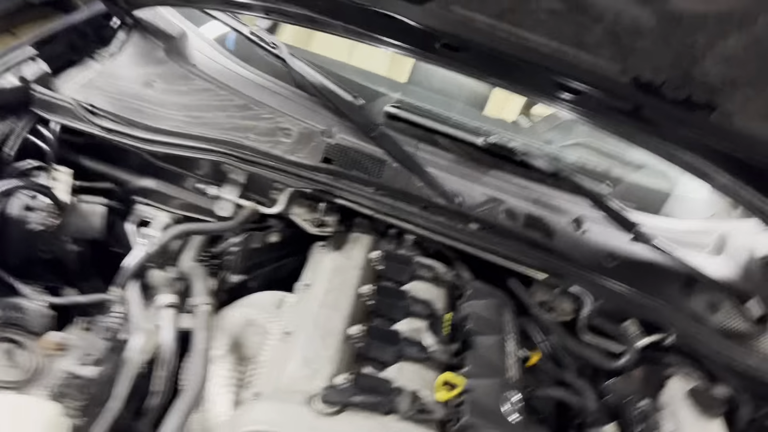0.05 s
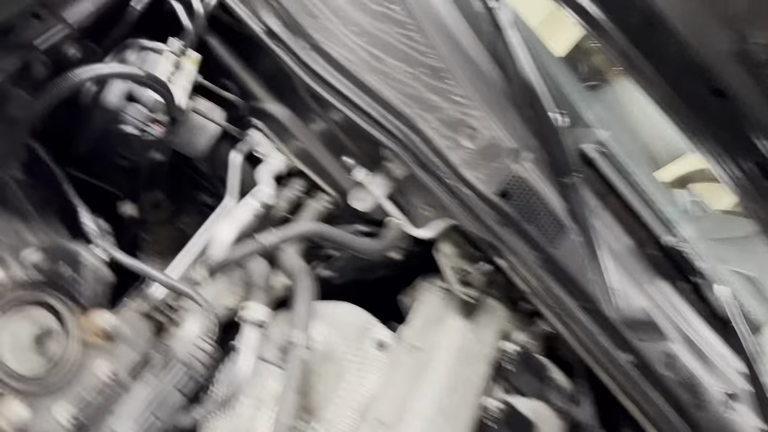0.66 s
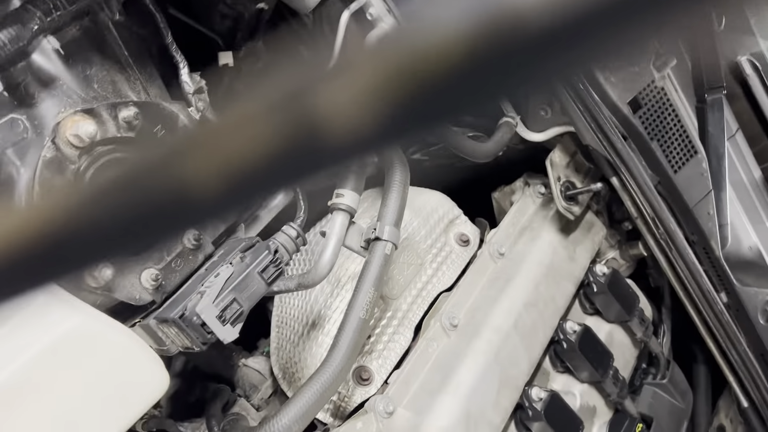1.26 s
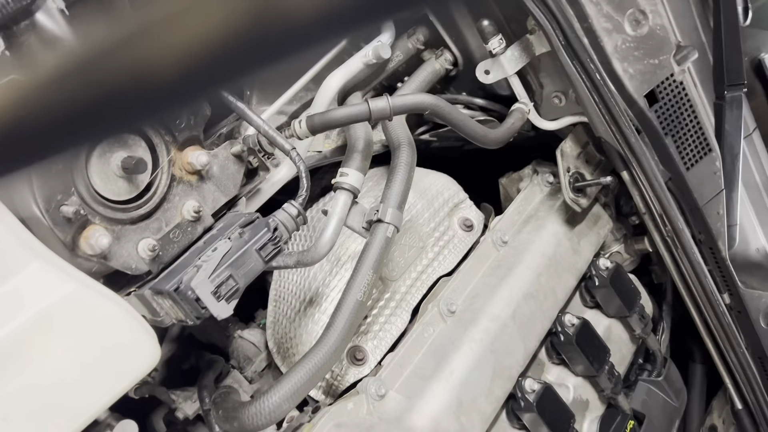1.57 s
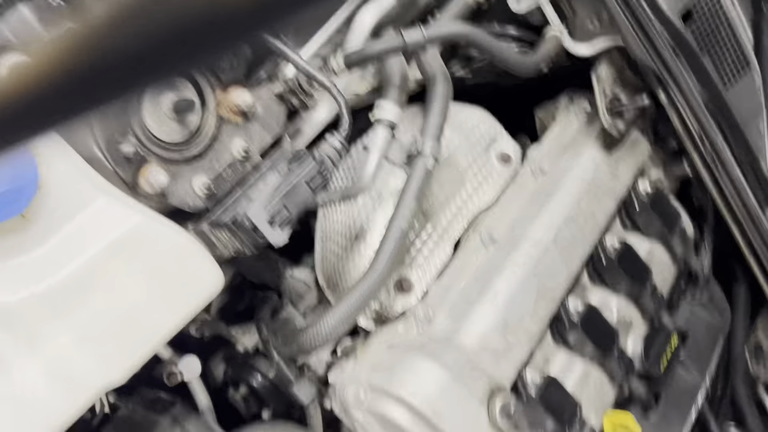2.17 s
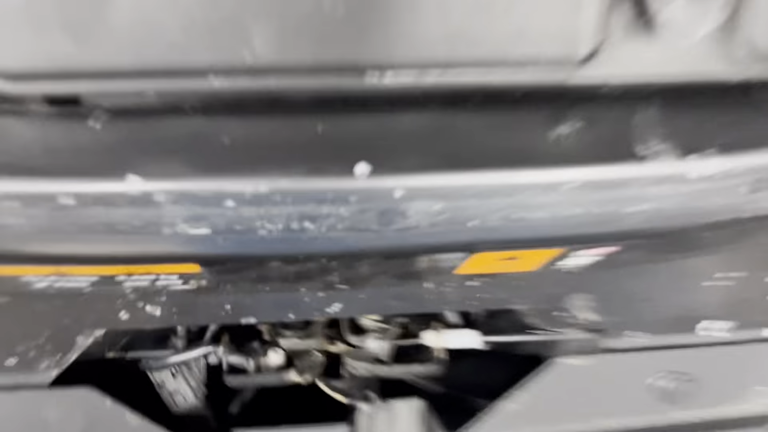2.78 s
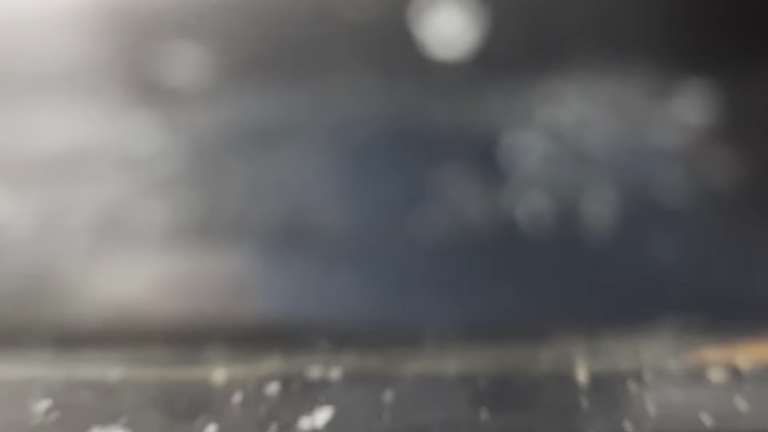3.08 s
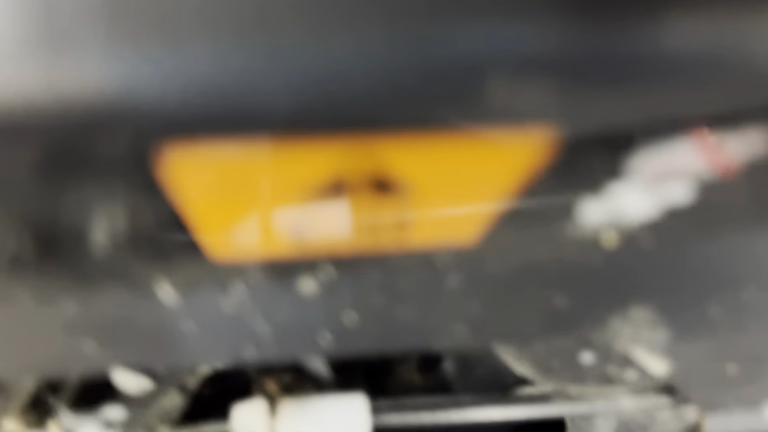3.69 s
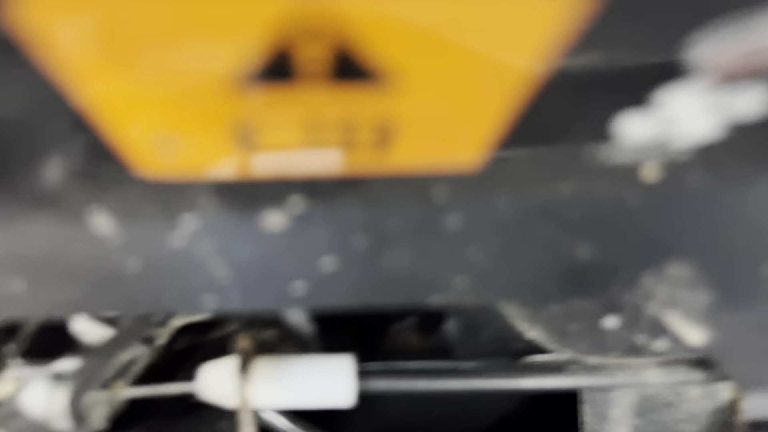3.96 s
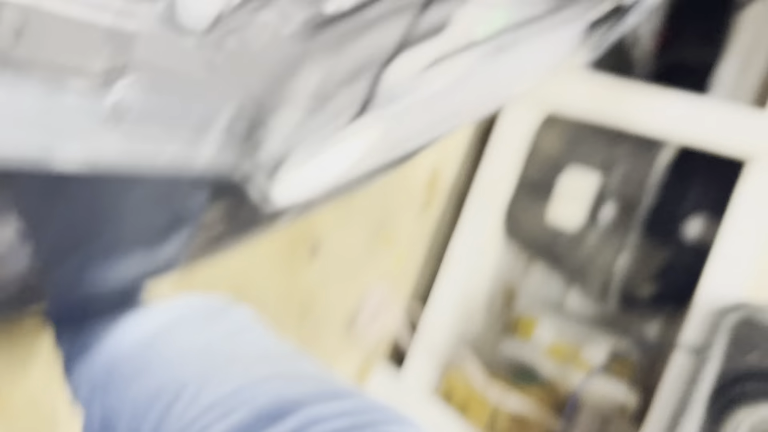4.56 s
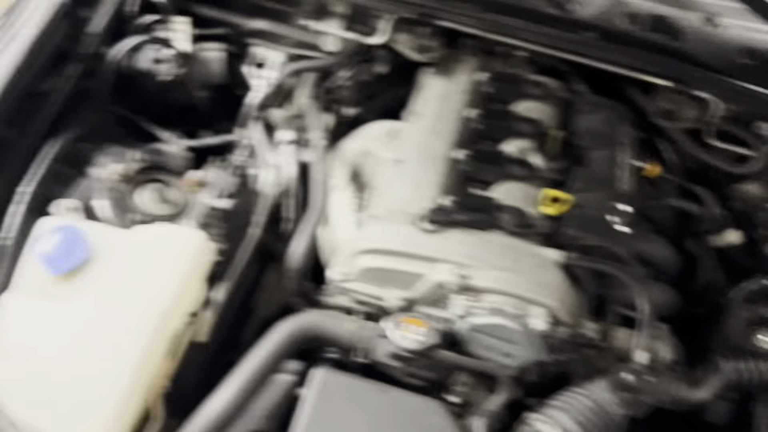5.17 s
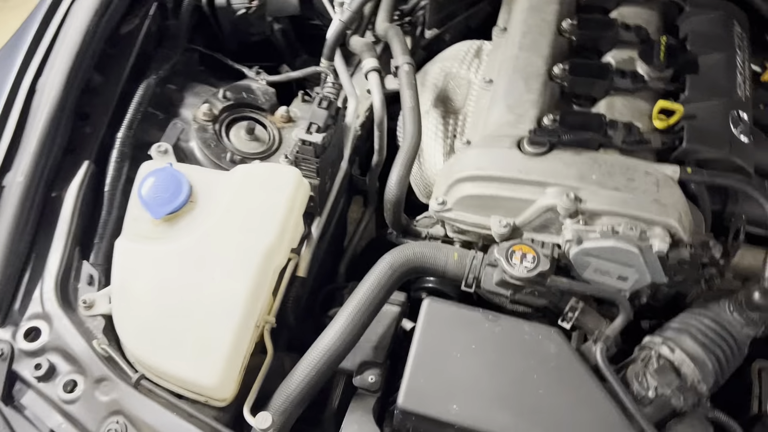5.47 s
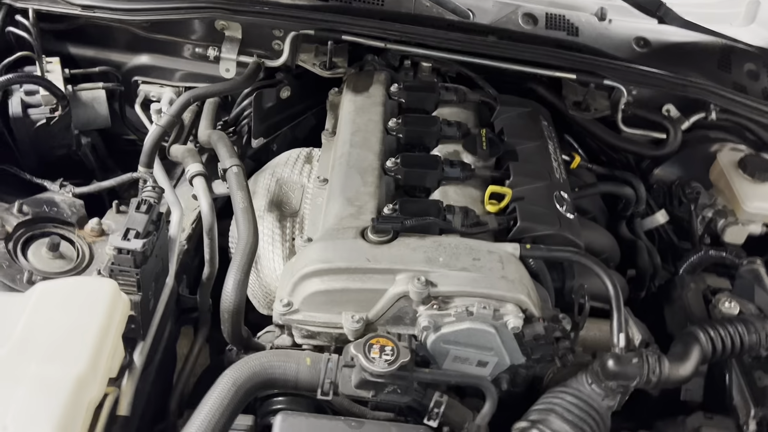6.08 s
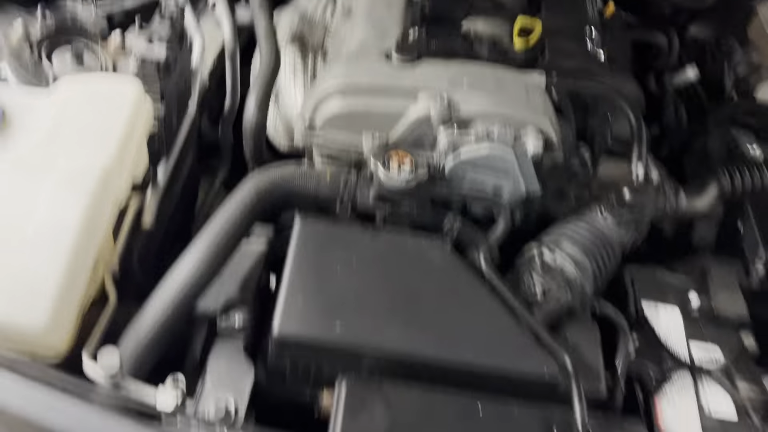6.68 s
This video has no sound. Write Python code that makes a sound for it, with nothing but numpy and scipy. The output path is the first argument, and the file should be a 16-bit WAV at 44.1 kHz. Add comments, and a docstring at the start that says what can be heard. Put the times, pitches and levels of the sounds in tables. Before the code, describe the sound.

Loose metal clunks, a clacking catch, then a car hood banging shut, followed by soft bumps and scuffs in a garage.

```python
"""Someone works at a car's steel hood in a garage, a camera in one hand. Over a low rumble, clothes rustle,
light knocks land on the bodywork and a small part ticks. From 1.2 s the loose hood clunks on its supports;
then steel parts jingle faintly and the hand bumps the camera. At 3 s the hood shudders and its safety
catch clacks twice. Near 4 s one loud bang of steel on the latch leaves the hood ringing. More bumps,
scuffing and clicking soles and a few last knocks follow. The garage adds a short echo."""
import sys
import numpy as np
from scipy import signal
from scipy.fft import rfft, irfft, next_fast_len
from scipy.io import wavfile
from scipy.ndimage import uniform_filter1d, map_coordinates

SR = 44100
rng = np.random.default_rng(int(sys.argv[2]) if len(sys.argv) > 2 else 0)


def to_wav(s):
    """Save 16-bit WAV."""
    ch = np.atleast_2d(s).T  # columns
    pcm = np.round(np.clip(ch, -1, 1) * 32767)  # PCM
    wavfile.write(sys.argv[1], SR, pcm.astype(np.int16))


N = 301644

# the hood's lasting tones, and the boom of the car's front end: pitch_hz, level_db, fade_s
# (fade_s is always the time to fall by 60 dB)
HOOD_TONES = [(224, -6.5, 0.87), (369, -12, .9), (409, -5, 0.55), (450, -17, 0.87), (549, -14.5, 0.65),
              (680, -16, 0.3), (980, -24, 0.4), (1120, -16, 0.37), (1166, -13.5, 0.7), (1310, -19, 0.7),
              (1530, -24.5, .45), (1560, -23, 0.35), (1700, -24, 0.81), (1744, -22, 0.35),
              (2100, -23.5, 0.7), (2200, -27.5, 0.52), (2552, -32, .45)]
BOOM_TONES = [(63, -8, 0.44), (75.7, -4.5, 0.4), (85, 0.5, 0.21), (111.4, 5, 0.098), (146.6, -3, 0.34),
              (177.4, -3.5, 0.23), (221.9, -1.5, 0.14), (264, -5, 0.062)]
# resonances, the pitches that the steel panel favours: pitch_hz, width_hz, boost_db
PANEL_PEAKS = [(404, 21, 6), (514, 73, 5.5), (651, 27, 4.5), (756, 14, 1.5), (1016, 24, 2.5), (1066, 58, 6),
               (1152, 32, 7), (1234, 54, 9), (1356, 21, 5), (1450, 91, 6.5), (1684, 140, 6.5),
               (2006, 100, 5), (2420, 60, 3), (5040, 750, 6.5)]
# the colour (balance of bass and treble) of each kind of hit: pitch_hz, level_db
KNOCK_COLOUR = [(100, -14.5), (220, 1.5), (450, -2), (780, -11.5), (1200, -13.5), (2400, -19), (6000, -26),
                (9000, -35), (16000, -48)]
TICK_COLOUR = [(350, -19.5), (600, -1), (1550, -11), (2610, -12), (3680, -17.5), (9110, -22), (10500, -32),
               (11700, -23.5), (16000, -36)]
CLUNK_COLOUR = [(120, -26), (280, -4.5), (480, -9), (800, -12), (1300, -13), (1900, -19), (2700, -13.5),
                (5000, -29), (9000, -35), (11000, -47), (16000, -58)]
CATCH_COLOUR = [(120, -12), (240, -3), (600, -2.5), (1100, -12), (2000, -19.5), (3200, -21.5), (6500, -24),
                (9500, -22), (12500, -22.5), (16000, -30.5)]
# how fast struck sheet steel and longer-shivering steel fall silent: pitch_hz, fade_s
SHEET_FADE = [(200, 0.44), (600, 0.26), (1500, 0.2), (4000, 0.087), (12000, 0.19)]
SHIVER_FADE = [(300, 1), (1200, 0.62), (2400, 0.47), (4000, 0.58), (9000, 0.89), (14000, 0.13)]
# how alike the two ears hear a sound from ahead: pitch_hz, likeness (1 same, -1 opposite)
AHEAD = [(120, 0.96), (280, 0.27), (600, 0.08), (1500, 0.27), (8000, 0.14)]
# the safety catch clacking over the striker, the bar it grips: start_s, body_db, boom_db, snap_db, snap_hz
CATCH_CLACKS = [(3.178, -20.5, -26.5, -35.5, 8700), (3.2044, -37.5, -33, -38.5, 4338)]


def amp(db):
    """Turn decibels into a gain."""
    return 10 ** (np.asarray(db) / 20)


def unit(x):
    """Scale to an average (rms) level of 1."""
    return x / np.sqrt(np.mean(x ** 2) + 1e-20)


def unit_hit(x):
    """Scale a hit to an average (rms) level of 1 over its first 30 ms."""
    return x / np.sqrt(np.mean(x[..., :SR // 33] ** 2) + 1e-20)


def along(points, hz):
    """Read between the (pitch_hz, value) points of a curve, on a log pitch axis."""
    pitches, values = np.transpose(points)
    return np.interp(np.log(hz + 1), np.log(pitches + 1), values)


def wobble(per_s):
    """A smooth curve through per_s random values a second."""
    return map_coordinates(rng.standard_normal(int(N * per_s / SR) + 4), [np.arange(N) * per_s / SR])


def add(track, start_s, sound):
    """Mix a sound into the track."""
    start = round(start_s * SR)
    track[:, start:start + sound.shape[-1]] += sound[..., :N - start]


def shape(colour, peaks, hz):
    """The level in dB of a colour with resonances on top."""
    return along(colour, hz) + sum(db / (1 + (2 * (hz - f) / width) ** 2) for f, width, db in peaks)


def stereo(mid, side, likeness, hz):
    """Blend two unrelated spectra into left and right ones with the given likeness."""
    turn = np.arccos(np.clip(along(likeness, hz), -1, 1)) / 2
    return mid * np.cos(turn) + np.array([side, -side]) * np.sin(turn)


def noise(colour, size, peaks=()):
    """Coloured stereo noise from ahead."""
    hz = np.fft.rfftfreq(size, 1 / SR)
    phases = np.exp(2j * np.pi * rng.random((2, len(hz))))
    return unit(irfft(stereo(*phases, AHEAD, hz) * amp(shape(colour, peaks, hz)), size))


def split(x, edge_hz):
    """The parts of a sound below and above a pitch."""
    size = x.shape[-1]
    low = irfft(rfft(x) / (1 + (np.fft.rfftfreq(size, 1 / SR) / edge_hz) ** 8), size)
    return low, x - low


def fade(x, fades):
    """Let each pitch die away at its own speed."""
    hz, t, spectra = signal.stft(x, SR, nperseg=256)
    dying = spectra * amp(-60 * t / along(fades, hz)[:, None])
    return signal.istft(dying, SR, nperseg=256)[1][:, :x.shape[-1]]


def patchy(x):
    """Let a sound's colour shift from moment to moment."""
    spectra = signal.stft(x, nperseg=512)[2]
    patches = uniform_filter1d(rng.standard_normal(spectra.shape[1:]), size=7, axis=0)
    shift_db = 3 * unit(uniform_filter1d(patches, size=5, axis=1))
    return signal.istft(spectra * unit(amp(shift_db)), nperseg=512)[1][:, :N]


def causal(gain):
    """A filter with this gain that rings only after it is hit, never before."""
    cepstrum = irfft(np.log(gain + 1e-9))
    half = cepstrum.shape[-1] // 2
    return np.exp(rfft(cepstrum * np.r_[1, np.full(half - 1, 2), 1, np.zeros(half - 1)]))


def ring(tones, rise_s, scatter_db, spread, bias=((1, 0),)):
    """Struck steel rings in fading, wandering tones; spread puts the two ears out of step."""
    wander = .006  # each tone blurs over this share of its pitch
    t = np.arange(SR) / SR
    out = np.zeros((2, SR))
    for hz, db, fade_s in tones:
        phase = rng.uniform(0, 2 * np.pi)
        phase += rng.standard_normal((2, 1)) * min(spread * np.sqrt(hz / 1000), 2)
        drift = np.cumsum(rng.standard_normal(SR)) * np.sqrt(2 * np.pi * wander * hz / SR)
        start_db = db + along(bias, hz) + scatter_db * rng.normal()
        out += amp(start_db - 60 * t / fade_s) * np.sin(2 * np.pi * hz * t + phase + drift)
    return unit_hit(out * (1 - np.exp(-t / rise_s)) ** 2)


def contact(colour, peaks, fades, stretch, rise_s, tilt_db=0, chatter_db=0, likeness=AHEAD):
    """A hit: dying noise wakes a part's resonances. Gives the body below 2800 Hz and the crack above."""
    size = SR // 2
    hz = np.fft.rfftfreq(size, 1 / SR)
    swell = 1 - np.exp(-np.arange(size) / SR / rise_s)
    chatter = amp(chatter_db * wobble(330)[:size])  # loose parts make the hit uneven
    fades = [(f, fade_s * max(stretch, .2)) for f, fade_s in fades]
    burst = rfft(fade(rng.standard_normal((2, size)), fades) * swell * chatter)
    power = np.abs(uniform_filter1d(np.abs(burst) ** 2, size=25, axis=1))
    level_db = shape(colour, peaks, hz) + tilt_db * np.log2(np.maximum(hz / 1000, 1))  # tilt per octave
    response = causal(amp(level_db) * np.sqrt(along(fades, hz) / power))
    hit = irfft(stereo(*(burst * response), likeness, hz))
    filters = [signal.butter(4, 2800, kind, fs=SR, output="sos") for kind in ("low", "high")]
    return [unit_hit(signal.sosfilt(np.vstack([sos, sos]), hit)) for sos in filters]


def spot(count, depth_db):
    """Each spot on the steel has its own mild peaks, and deeper gaps for pitches it cannot shake."""
    pitches = np.geomspace(700, 11000, count) * np.exp(.015 * rng.standard_normal(count))
    return [(hz, hz / 32, min(depth_db * rng.uniform(-1, 1), 3)) for hz in pitches]


def room_tone():
    """The garage's low, drifting rumble and a faint hiss that comes and goes."""
    # the background's colour: pitch_hz, level_db
    room_colour = [(12, -34.5), (20, -9), (53, 3.5), (81, 2), (248, -14.5), (472, -27), (759, -31),
                   (1190, -31.5), (3740, -43), (6910, -45), (8890, -51.5), (10200, -62.5), (12100, -49),
                   (16000, -78.5)]
    # the hiss's rise and fall: time_s, level_db
    hiss_levels = [(0, 1), (.5, -6.5), (1.15, -5), (2.35, -4), (2.75, -4), (3.1, -8), (3.35, -8),
                   (3.8, -6.5), (4.549, -6), (4.9, -2), (5.65, -3.5), (6.1, -7), (6.35, -5), (6.8, 3)]
    rumble, hiss = split(noise(room_colour, N), edge_hz=300)
    hiss_db = np.interp(np.arange(N) / SR, *np.transpose(hiss_levels)) + wobble(8)
    rumble_db = -5 + 0.99 * wobble(10)
    return amp(-49.5) * (amp(rumble_db) * rumble + amp(hiss_db) * hiss)


def rustle_and_hum():
    """Short, gritty swells of noise: mostly cloth and soles that slide and snag, once the hood's hum."""
    # the swells: start_s, length_s, low_db, high_db, hollow_hz
    # (the one at 4.462 s is the hood's low hum lingering after the bang)
    swells = [(0.06, 0.031, -77, -69, 1470), (0.473, 0.62, -82, -77.5, 910),
              (0.674, 0.029, -89, -60.5, 900), (2.558, 0.15, -55, -75.5, 438), (4.284, 0.11, -57, -85, 637),
              (4.343, 0.13, -62.5, -58.5, 1150), (4.462, 0.12, -62.5, -90, 248),
              (4.634, 0.16, -65, -64, 1730), (5.018, 0.067, -58, -63, 1003), (5.29, 0.086, -60, -65, 1360),
              (5.449, 0.078, -49, -59, 1660), (5.739, 0.157, -55, -66, 515), (5.794, 0.18, -56, -73, 1400),
              (5.982, 0.062, -59.5, -70, 1580), (6.14, 0.052, -65.5, -63, 1300),
              (6.169, 0.073, -55, -94, 547), (6.292, .08, -56.5, -88.5, 600),
              (6.638, 0.15, -53.5, -60, 1070), (6.709, 0.098, -60.5, -61, 1460)]
    # their colour: pitch_hz, level_db
    swell_colour = [(150, -15.5), (300, 5.5), (550, -0.5), (900, -5.5), (1600, -9), (2600, -12),
                    (5000, -15), (8500, -16.5), (10500, -25), (16000, -36.5)]
    snags_per_s, snag_s = 140, .0009
    out = np.zeros((2, N))
    t = np.arange(SR) / SR
    for start_s, length_s, low_db, high_db, hollow_hz in swells:
        hollow = noise(swell_colour, SR, peaks=[(hollow_hz, hollow_hz / 2.24, 12.5)])
        low, high = map(unit, split(hollow, edge_hz=2270))
        swell = (t / length_s) ** 0.62 * np.exp(-(t / length_s / 0.65) ** 2)
        add(out, start_s, swell / swell.max() * (amp(low_db) * low + amp(high_db) * high))
    grit = unit(amp(1.1 * wobble(80) + 1.5 * wobble(500)))
    snags = (rng.random(N) < snags_per_s / SR) * rng.uniform(.3, 1, N)
    snags = unit(signal.lfilter([1], [1, -np.exp(-1 / (snag_s * SR))], snags))
    return patchy(out) * np.hypot(grit, amp(-8.5) * snags) * amp([[1.1], [-1.1]])  # a little to the left


def garage_echo(x):
    """Walls and floor answer with a short, blurred echo that changes as the camera moves."""
    # how fast the garage falls silent: pitch_hz, fade_s
    garage_fade = [(100, 1), (500, 0.16), (2000, 0.37), (6000, 0.29), (14000, 0.18)]
    out = np.zeros((2, N))
    step, size = SR // 4, SR // 2
    swell = 1 - np.exp(-np.arange(size) / SR / 0.0012)
    for start in range(0, N, step):
        tail = fade(noise([(100, 0), (16000, 0)], size), garage_fade) * swell
        tail /= np.linalg.norm(tail[0])
        add(out, start / SR, signal.fftconvolve(x[:, start:start + step], tail, axes=1))
    return out


def knocks():
    """Soft hits give a hollow knock, duller the weaker its crack, and barely wake the hood."""
    # light knocks on the bodywork: start_s, panel_db, crack_db, boom_db, spot_hz
    hits = [(0.447, -29.5, -59, -50, 647), (0.619, -44.5, -86, -54, 650), (0.866, -43, -79, -55, 640),
            (0.970, -41, -72, -44.5, 350), (2.993, -39, -66.5, -53, 336), (3.53, -36.5, -69.5, -48, 485.5),
            (5.992, -43, -73, -44.5, 526), (6.024, -53.5, -75, -53.5, 519), (6.416, -26.5, -57, -30, 770)]
    out = np.zeros((2, N))
    for start_s, db, crack_db, boom_db, spot_hz in hits:
        peaks = [(spot_hz, spot_hz / 3.6, 8), (590, 260, 2.5), (798, 230, 3.5), (1130, 260, 5)]
        panel, crack = contact(KNOCK_COLOUR, peaks, SHEET_FADE, stretch=0.63, rise_s=0.0013,
                               tilt_db=1.5 * (crack_db - db + 27))
        add(out, start_s, (amp(db - 9.5) * panel + amp(crack_db) * crack) * amp([[1.1], [-1.1]]))
        add(out, start_s, amp(boom_db - 3.5) * ring(BOOM_TONES, 0.0056, scatter_db=0.5, spread=0.32))
        add(out, start_s, amp(db - 24) * ring(HOOD_TONES, 0.0023, scatter_db=3.5, spread=8.4))
    return out


def ticks():
    """Small stiff parts click with one main resonance and stop quickly; the one at 3.948 s is the hood's
    striker first touching the latch just before the bang."""
    # the ticks: start_s, body_db, treble_db, stretch (multiplies the fade time), pitch_hz
    hits = [(1.039, -28.5, -43, 0.68, 3950), (3.415, -68, -73, .9, 6000), (3.471, -25.5, -53.5, .35, 1506),
            (3.495, -31.5, -56, .3, 1480), (3.649, -71, -67, 0.62, 3000), (3.948, -48, -55.5, 1.3, 3793),
            (4.288, -53.5, -50.5, 0.34, 7500), (4.5, -56.5, -61.5, 0.34, 4840),
            (5.339, -42, -68.5, 0.56, 1574), (5.905, -61, -61, .7, 8200), (6.146, -43, -61, 0.85, 6580),
            (6.421, -22.5, -43.5, 0.55, 2200)]
    # how fast stiff parts fall silent: pitch_hz, fade_s
    stiff_fade = [(200, 0.47), (450, 0.13), (1200, 0.12), (4000, 0.08), (12000, 0.26)]
    out = np.zeros((2, N))
    for start_s, db, treble_db, stretch, hz in hits:
        peaks = [(hz, hz / 3.7, 8)] + spot(count=30, depth_db=8)
        body, crack = contact(TICK_COLOUR, peaks, stiff_fade, stretch, rise_s=.0012)
        add(out, start_s, amp(db - 22.5) * body + amp(treble_db - 8.5) * crack)
    return out


def scrape(out, hit_s, db, colour, swell_s):
    """Steel slides or swishes, growing louder up to the moment it hits."""
    t = np.arange(-SR // 4, 0) / SR
    add(out, hit_s + t[0], amp(db) * np.exp(t / swell_s) * noise(colour, len(t)))


def bend(x, delay_s, edge_hz):
    """Low bending waves cross the sheet slowly, so the bass arrives after the treble."""
    size = x.shape[-1]
    phase = 2 * np.pi * delay_s * edge_hz * np.arctan(np.fft.rfftfreq(size, 1 / SR) / edge_hz)
    return irfft(rfft(x) * np.exp(-1j * phase), size)


def from_right(x, lead_s):
    """A clunk reaches the right microphone lead_s early, with its own balance at each pitch."""
    # the clunks' balance: pitch_hz, left_minus_right_db
    balance = [(100, -1), (350, -4), (700, -1), (2400, 1), (4400, 7.5), (9000, 0.5), (15000, 2)]
    hz = np.fft.rfftfreq(N, 1 / SR)
    left = amp(along(balance, hz) / 2) * np.exp(-1j * np.pi * hz * lead_s)
    return irfft(rfft(x) * np.array([left, 1 / left]), N)


def clunks():
    """The loose hood slides and hits, shaking its sheet and the front end; soft hits are slow and dull."""
    # the hood clattering on its supports:
    # start_s, panel_db, crack_db, scrape_db, boom_db, stretch, low_spot_hz, high_spot_hz
    hits = [(1.204, -24.5, -51.5, -40, -27, 0.34, 292, 850), (1.253, -19.5, -37, -30, -30, 0.47, 326, 1660),
            (1.268, -22.5, -42, -46, -32.5, 0.74, 810, 2070),
            (1.425, -37.5, -57, -50.5, -30.5, 1, 150, 1100),
            (1.578, -40.5, -59.5, -51, -38.5, 0.11, 390, 900),
            (1.604, -17, -30.5, -30, -28, 0.78, 650, 1720),
            (1.694, -33.5, -44.5, -49, -28, 0.34, 305, 1250),
            (1.797, -23.5, -46.5, -45.5, -35.5, 0.47, 326, 800),
            (1.913, -23.5, -61.5, -56, -31, 0.72, 312, 940), (2.026, -10, -24, -24, -23, 0.43, 693, 1230),
            (2.037, -18.5, -36.5, -47.5, -32, 0.33, 510.6, 905),
            (2.068, -22, -43.5, -36, -31.5, 1, 643, 1180),
            (2.106, -21, -30.5, -49.5, -30.5, 0.29, 402, 780)]
    # how alike the two ears hear a sound from the side: pitch_hz, likeness (capped at 1)
    aside = [(150, 3.8), (300, 1.5), (550, -0.37), (1300, 0.9), (3000, 0.06), (9000, 0)]
    body, cracks = np.zeros((2, 2, N))
    for start_s, db, crack_db, scrape_db, boom_db, stretch, *spots_hz in hits:
        rise_s = .0026 * 2 ** ((-28 - crack_db) / 17)  # twice as slow for each 17 dB less crack
        peaks = PANEL_PEAKS + [(hz, hz / 3.5, 7) for hz in spots_hz] + spot(count=50, depth_db=13)
        panel, crack = contact(CLUNK_COLOUR, peaks, SHEET_FADE, stretch, rise_s,
                               tilt_db=crack_db - db + 16, chatter_db=3.5, likeness=aside)
        add(body, start_s, amp(db - 6) * bend(panel, delay_s=0.0035, edge_hz=360))
        add(cracks, start_s, amp(crack_db - 3.5) * crack)
        scrape(cracks, start_s + 0.0017, scrape_db, CLUNK_COLOUR, swell_s=0.0057)
        add(body, start_s + .005, amp(boom_db) * ring(BOOM_TONES, 0.0024, scatter_db=1, spread=1))
        add(body, start_s, amp(db - 35.5) * ring(HOOD_TONES, .003, scatter_db=4, spread=0.87))
    return from_right(body, lead_s=0.00046) + from_right(cracks, lead_s=0)


def clinks():
    """Small loose steel parts are jostled and give faint, gritty pings."""
    # the pings: start_s, body_db, treble_db, pitch_hz
    pings = [(2.354, -71.5, -94, 1774), (2.419, -68.5, -61, 4540), (2.591, -65.5, -75, 2130),
             (2.8, -74.5, -80, 2040)]
    # the small parts' resonances: pitch_hz, width_hz, boost_db
    part_peaks = [(2430, 450, 8.5), (3550, 780, 12), (5185, 510, 12), (7550, 1500, 10)]
    out = np.zeros((2, N))
    for start_s, db, treble_db, hz in pings:
        peaks = part_peaks + [(hz, hz / 6, 9)]
        body, grit = contact(TICK_COLOUR, peaks, SHIVER_FADE, stretch=0.6, rise_s=0.0015)
        add(out, start_s, amp(db) * body + amp(treble_db) * grit)
    return out * unit(amp(2.5 * wobble(120)))


def camera_bumps():
    """Fingers push on the camera: dull, rough thuds, alike in both ears."""
    # the bumps: start_s, level_db
    bumps = [(2.463, -35), (2.509, -28), (2.613, -18.5), (2.65, -29), (4.55, -34), (4.581, -29),
             (4.627, -31.5), (4.692, -35), (4.749, -31), (4.888, -45.5), (4.949, -53.5)]
    # a thud's colour: pitch_hz, level_db
    thud_colour = [(20, -11.5), (55, 11.5), (100, 2), (180, -6.5), (300, -23), (600, -67), (2000, -78)]
    out = np.zeros((2, N))
    t = np.arange(SR // 4) / SR
    push = (t / .007) ** 2 * np.exp(-t / 0.0088)
    for start_s, db in bumps:
        add(out, start_s, amp(db - 7.5) * unit_hit(push * noise(thud_colour, len(t))))
    return out


def hood_shudder():
    """Pressed towards the catch, the hood shudders softly until the catch holds it."""
    start_s, caught_s, damping_s = 3.0, CATCH_CLACKS[0][0], 0.052
    out = np.zeros((2, N))
    peaks = [(233, 76, 24.6), (492, 47, 5.6), (597, 160, 22), (1030, 70, 12), (1225, 150, 17)]
    hum, _ = contact(KNOCK_COLOUR, peaks, SHIVER_FADE, stretch=1.2, rise_s=0.039)
    add(out, start_s, amp(-53.5) * hum)
    held_s = np.maximum(np.arange(N) / SR - caught_s, 0)
    return out * np.exp(-held_s / damping_s)


def from_latch(x):
    """The latch lies a little to the left, so the same wave reaches the left microphone first."""
    # the latch's balance: pitch_hz, left_minus_right_db
    balance = [(2500, 0), (5000, 8), (8000, 0.5), (14000, 0.5)]
    lead_s = .000021
    hz = np.fft.rfftfreq(x.shape[-1], 1 / SR)
    left = amp(along(balance, hz) / 2) * np.exp(1j * np.pi * hz * lead_s)
    return unit_hit(irfft(rfft(x[0]) * np.array([left, 1 / left]), x.shape[-1]))


def safety_catch():
    """The sprung catch strikes and snaps over: two bright clacks, each on a dull boom."""
    # resonances of its spring and lever: pitch_hz, width_hz, boost_db
    lever_peaks = [(252, 70, 6.5), (438, 110, 9.5), (550, 100, 2), (835, 270, 13.5), (1230, 140, 5),
                   (3500, 400, 3), (11520, 1500, 7)]
    # how fast it falls silent: pitch_hz, fade_s
    catch_fade = [(200, 0.19), (450, 0.083), (1200, 0.1), (4000, 0.054), (12000, 0.032)]
    # which front-end tones it favours: pitch_hz, boost_db
    boom_bias = [(60, -3), (90, 1), (150, 1.5), (230, 4.5)]
    out = np.zeros((2, N))
    for start_s, db, boom_db, snap_db, snap_hz in CATCH_CLACKS:
        peaks = lever_peaks + [(snap_hz, snap_hz / 2.3, 9)] + spot(count=40, depth_db=6.5)
        body, snap = contact(CATCH_COLOUR, peaks, catch_fade, stretch=0.98, rise_s=0.0004, chatter_db=3.5)
        boom = ring(BOOM_TONES, rise_s=.003, scatter_db=0.5, spread=0.32, bias=boom_bias)
        add(out, start_s, amp(db - 11) * body * amp([[1.3], [-1.3]]))
        add(out, start_s, amp(snap_db - 1.5) * from_latch(snap))
        add(out, start_s, amp(boom_db - 0.5) * boom)
    return out


def latch_bang():
    """The hood swishes down, its striker scrapes in and hits the hook; the car booms, the hood rings."""
    # the bang's colour: pitch_hz, level_db
    bang_colour = [(110, -13), (170, -14.5), (220, -4), (275, -3), (335, 1), (410, 0), (490, -11.5),
                   (660, -4.5), (950, -8.5), (1400, -9.5), (2000, -15.5), (3200, -26), (6000, -28.5),
                   (9000, -25.5), (12000, -27.5), (16000, -34)]
    # the colour of the falling hood's swish: pitch_hz, level_db
    swish_colour = [(300, -8.5), (900, 0.5), (2400, 3), (4200, -6.5), (8000, -9), (11000, -19.5),
                    (16000, -30.5)]
    # resonances of the latch's steel hook: pitch_hz, width_hz, boost_db
    hook_peaks = [(407, 18, 5.5), (567, 14, 11), (870, 120, 2.5), (1165, 180, 2), (1480, 90, 1),
                  (2470, 210, 6.5), (3350, 250, 3.5), (4800, 520, 6.5), (7640, 900, 15), (8560, 500, 8.5),
                  (9700, 660, 7), (11650, 480, 10), (15100, 500, 9)]
    # how fast the latch panel falls silent: pitch_hz, fade_s
    latch_fade = [(150, 0.3), (400, 0.2), (700, 0.11), (1500, 0.15), (4000, 0.085), (12000, 0.015)]
    # which front-end tones the bang favours: pitch_hz, boost_db
    boom_bias = [(60, 6), (88, -5.5), (120, 4.5), (170, -5.5), (225, 5.5)]
    hit_s = 3.9878
    out = np.zeros((2, N))
    latch_peaks = hook_peaks + spot(count=40, depth_db=7.5)
    panel, crack = contact(bang_colour, latch_peaks, latch_fade, stretch=0.74, rise_s=0.0018)
    hood_peaks = PANEL_PEAKS + spot(count=40, depth_db=6)
    shiver, sizzle = contact(CLUNK_COLOUR, hood_peaks, SHIVER_FADE, stretch=0.39, rise_s=0.026)
    scrape(out, hit_s, db=-52, colour=swish_colour, swell_s=0.045)  # the hood falls
    scrape(out, hit_s, db=-29.5, colour=CATCH_COLOUR, swell_s=.012)  # the striker slides in
    add(out, hit_s, amp(-15) * bend(panel, delay_s=.009, edge_hz=380) + amp(-24.5) * from_latch(crack))
    add(out, hit_s, amp(-39) * shiver + amp(-55.5) * sizzle)
    boom = ring(BOOM_TONES, rise_s=0.0013, scatter_db=-0.5, spread=0.96, bias=boom_bias)
    add(out, hit_s + 0.0054, amp(-16.5) * boom)
    add(out, hit_s, amp(-34.5) * ring(HOOD_TONES, rise_s=0.0034, scatter_db=1, spread=0.59))
    return out


def sole_clicks():
    """A hard sole snaps on the floor: a few cycles of one resonance and no ring."""
    # dry, woody clicks: start_s, level_db, pitch_hz
    clicks = [(5.538, -56, 1440), (6.531, -55, 1564), (6.614, -47, 1580)]
    sole_fade = [(300, .04), (1500, .02), (8000, .012)]  # pitch_hz, fade_s
    out = np.zeros((2, N))
    for start_s, db, hz in clicks:
        body, edge = contact(TICK_COLOUR, [(hz, hz / 2, 13)], sole_fade, stretch=1, rise_s=.0002)
        add(out, start_s, amp(db) * (body + amp(-18) * edge))
    return out


def scene():
    """Mix everything; all but the camera bumps and the room tone echo in the garage."""
    clatter = clunks()
    latch = safety_catch() + latch_bang()
    small = knocks() + sole_clicks() + hood_shudder() + clinks() + rustle_and_hum()
    ticking = ticks()
    echo = garage_echo(amp(-13) * clatter + amp(-19) * latch + amp(-8.5) * small + amp(-11.5) * ticking)
    return clatter + latch + small + ticking + echo + camera_bumps() + room_tone()


def record(dry):
    """The camera colours the sound, rounds off the loudest peaks and cuts the highest treble."""
    # the microphone's colour: pitch_hz, gain_db
    mic_colour = [(18, -14.5), (40, 0), (9300, 1), (10300, -10), (11300, 0.5), (13000, -6), (14000, -4),
                  (15000, 2.5)]
    ceiling, top_hz = .92, 16200
    size = next_fast_len(N + SR // 2)
    hz = np.fft.rfftfreq(size, 1 / SR)
    heard = irfft(rfft(dry, size) * amp(along(mic_colour, hz)), size)
    rounded = heard / (1 + np.abs(heard / ceiling) ** 6) ** (1 / 6)
    return irfft(rfft(rounded) * (hz < top_hz), size)[:, :N]


dry = scene()
out = record(dry)
to_wav(out)
```